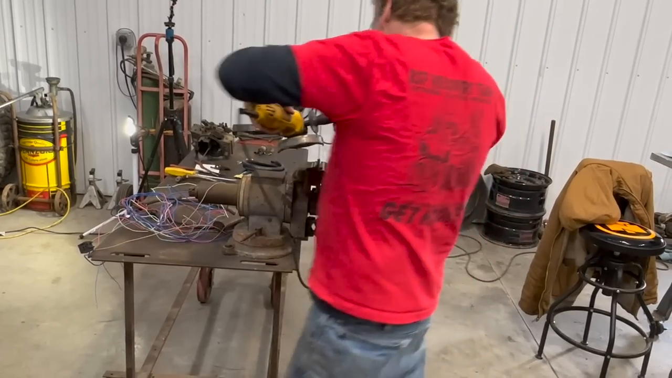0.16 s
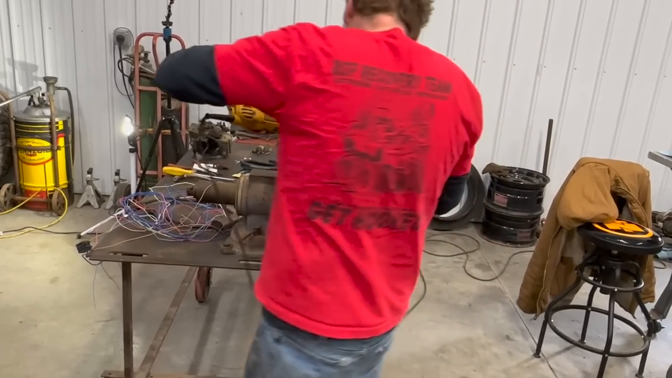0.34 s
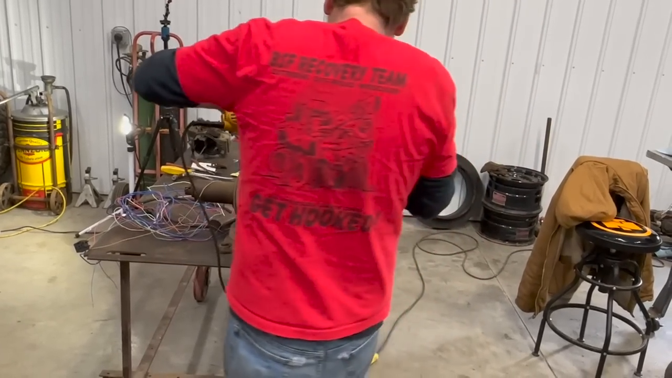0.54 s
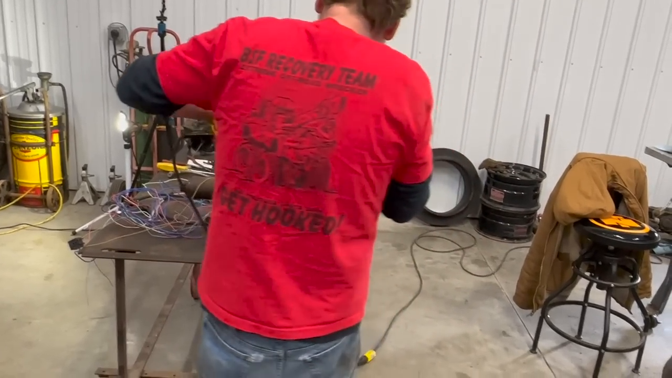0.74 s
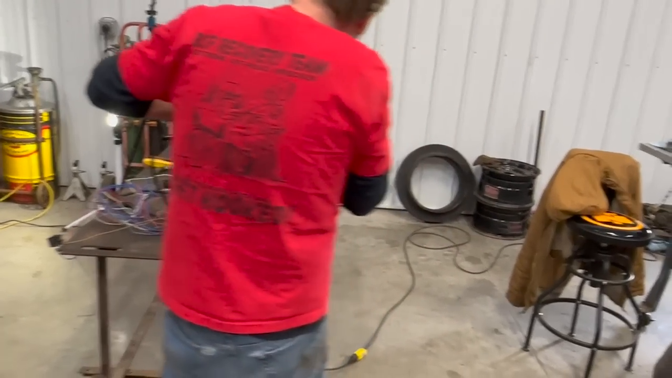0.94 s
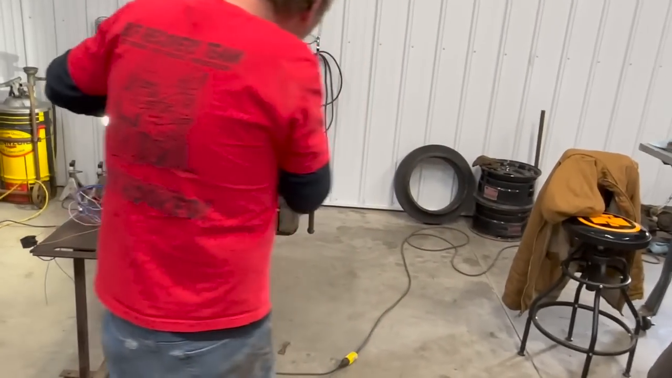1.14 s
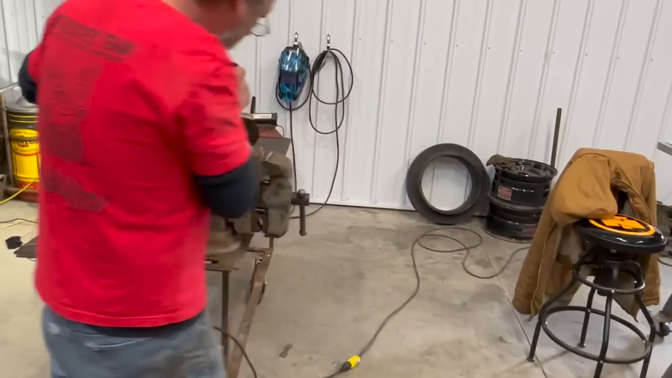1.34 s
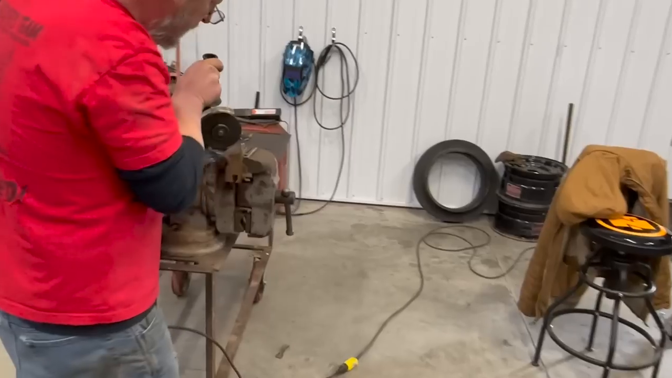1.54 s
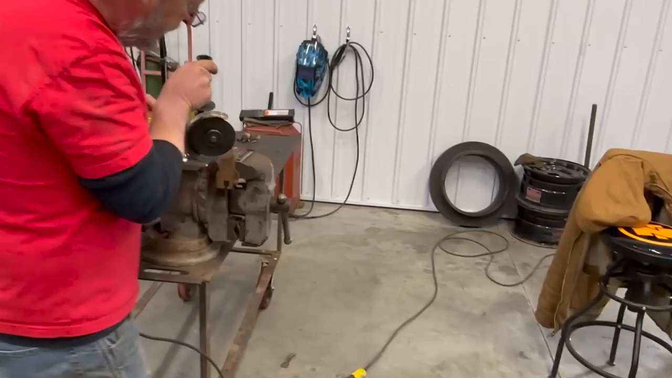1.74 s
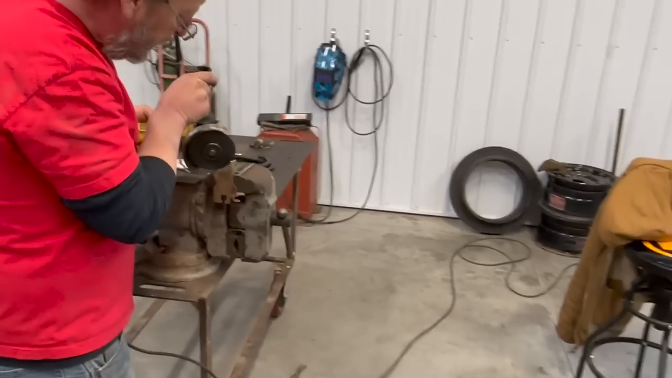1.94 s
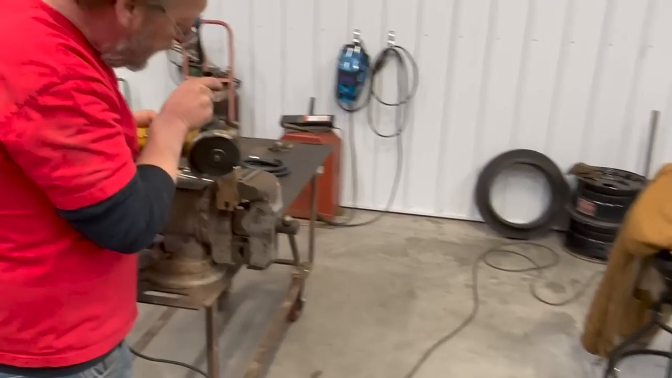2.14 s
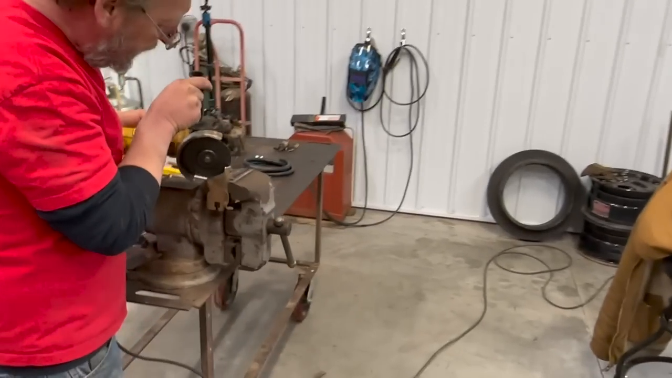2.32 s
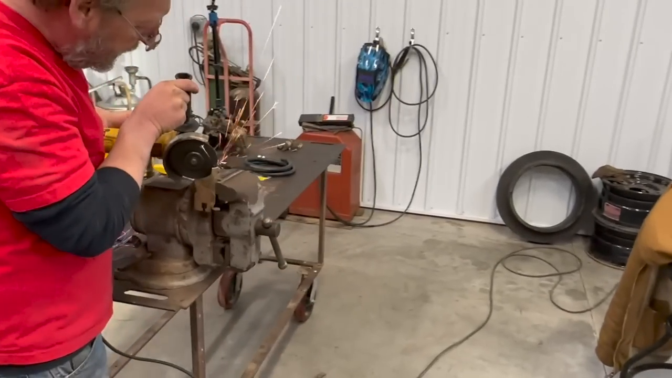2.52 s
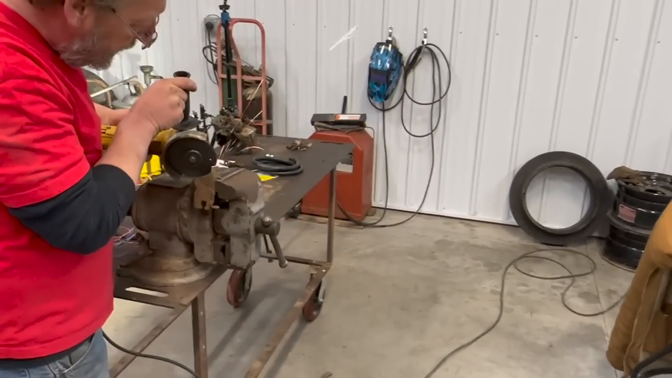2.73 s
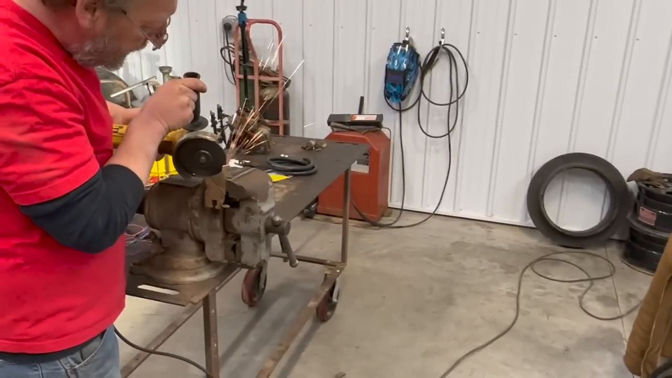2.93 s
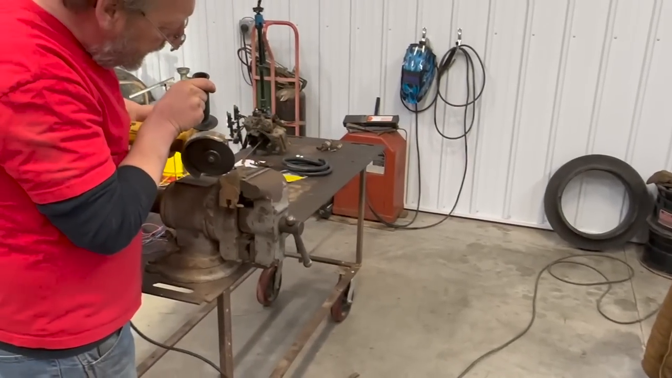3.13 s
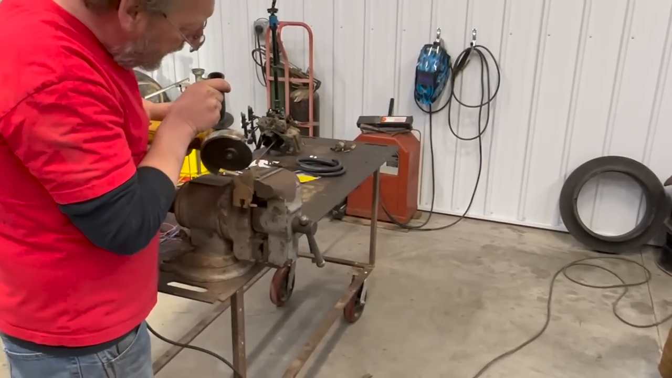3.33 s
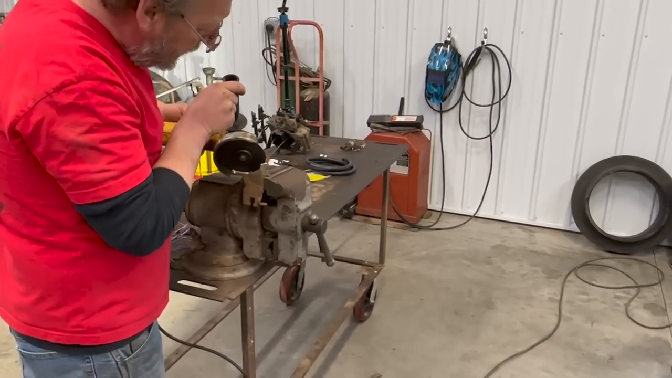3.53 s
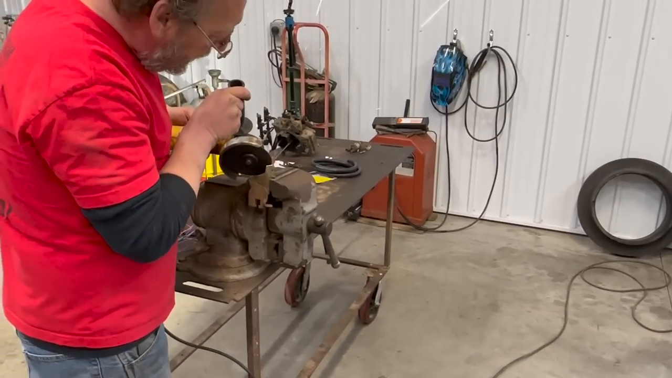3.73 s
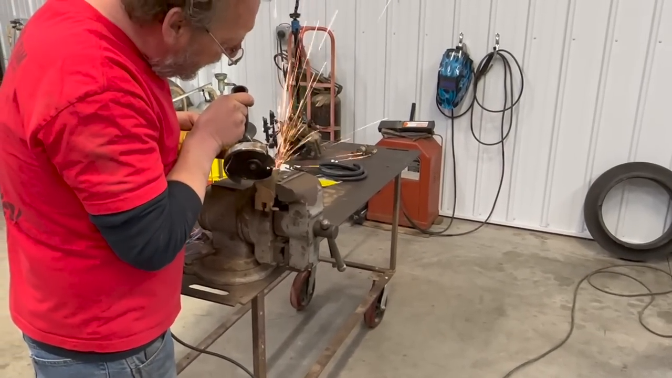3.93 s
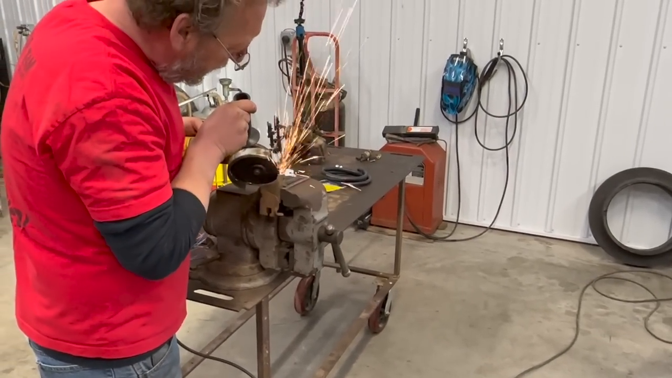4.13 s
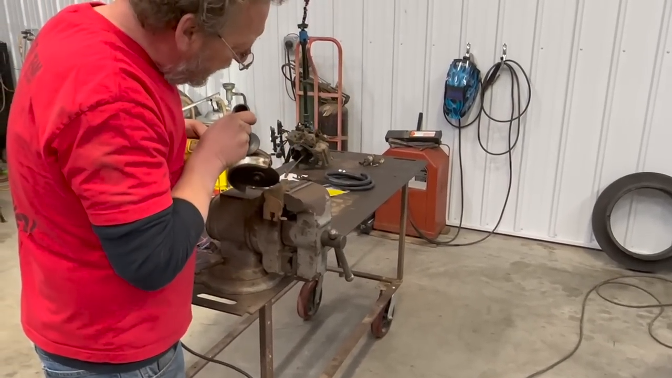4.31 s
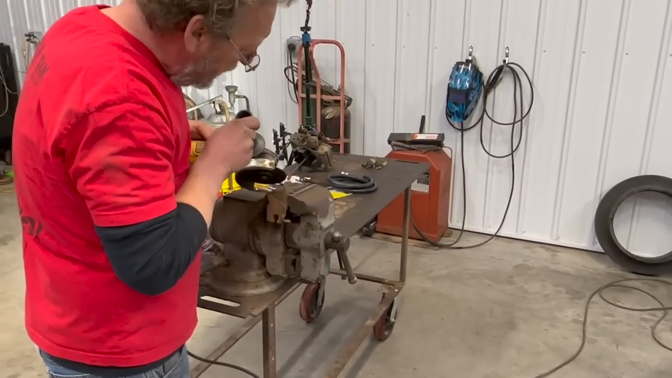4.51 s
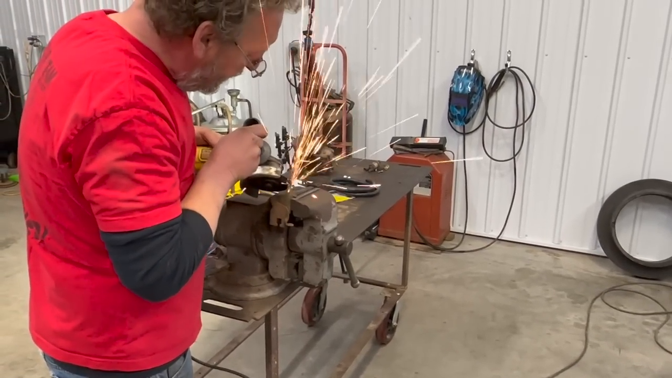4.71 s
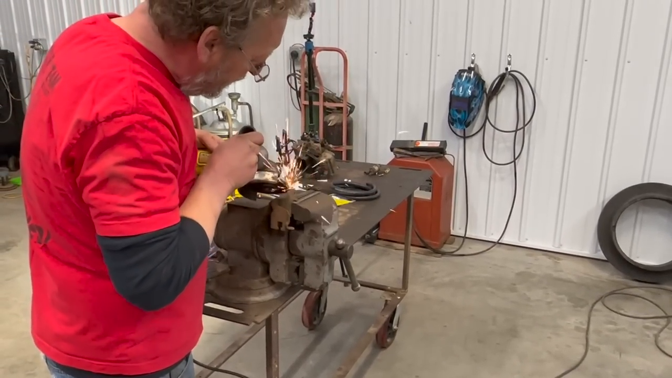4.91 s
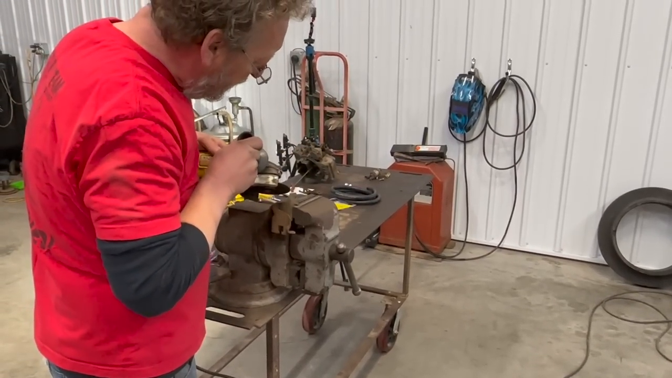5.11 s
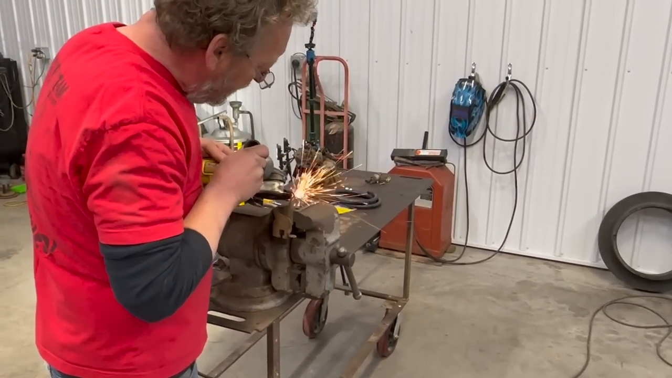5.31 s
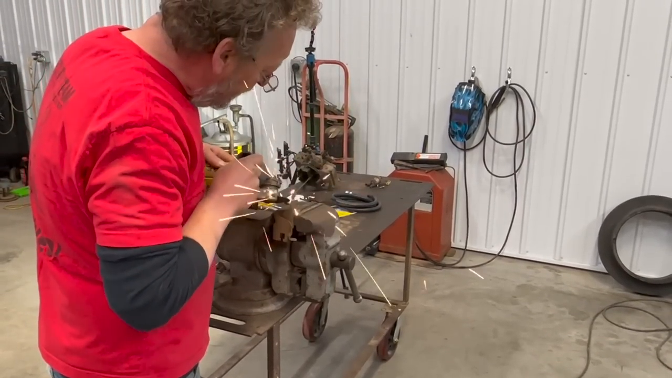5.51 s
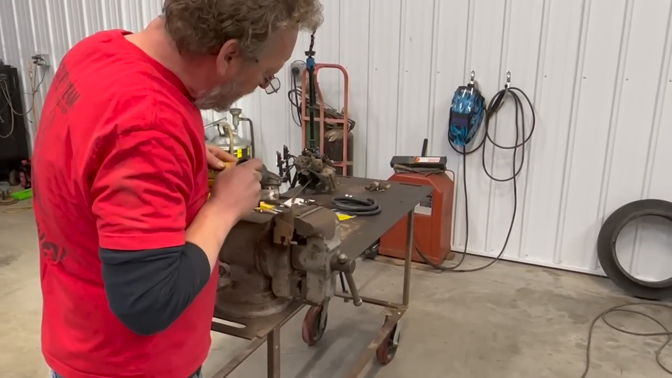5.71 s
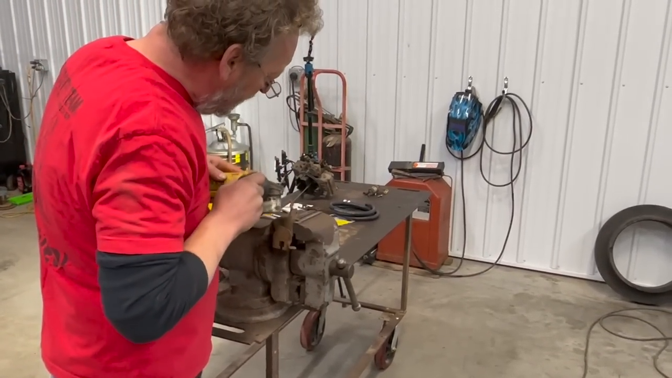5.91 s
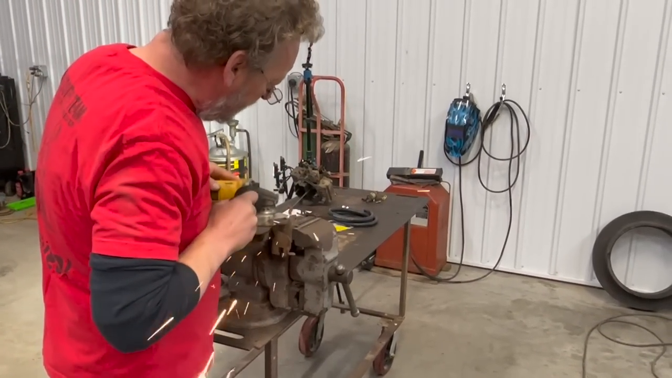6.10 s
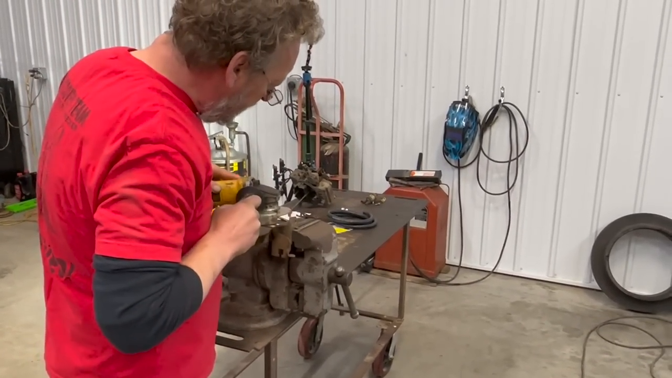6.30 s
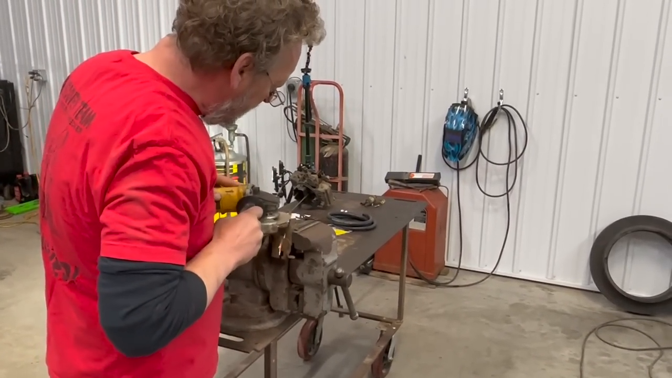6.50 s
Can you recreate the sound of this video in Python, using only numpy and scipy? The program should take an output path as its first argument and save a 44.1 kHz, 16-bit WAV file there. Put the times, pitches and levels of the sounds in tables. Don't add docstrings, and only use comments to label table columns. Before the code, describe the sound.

An angle grinder whirs and rattles in a metal workshop, its wheel biting a steel bracket in repeated rasping, ringing bursts while shoes scuff concrete.

```python
import sys
import numpy as np
from scipy import signal
from scipy.fft import rfft, irfft, next_fast_len
from scipy.io import wavfile
from scipy.ndimage import uniform_filter1d, map_coordinates

SR = 44100
rng = np.random.default_rng(int(sys.argv[2]) if len(sys.argv) > 2 else 0)


def materialize(psi):
    bounded = np.clip(np.atleast_2d(psi).T, -1, 1)
    quanta = np.round(bounded * 32767).astype(np.int16)
    wavfile.write(sys.argv[1], SR, quanta)


def volts_from_decibels(level):
    exponent = np.asarray(level, float) / 20
    return 10 ** exponent


N = 288855
GEARING = 9 / 32


def unit(x):
    return x / np.sqrt(np.mean(x ** 2) + 1e-20)


def along(points, hz):
    f, v = np.transpose(points)
    return np.interp(np.log(hz + 1), np.log(f + 1), v)


def curves(rows):
    s, *columns = np.transpose(rows)
    return [np.interp(np.arange(N) / SR, s, column) for column in columns]


def wobble(rate):
    knots = rng.standard_normal(int(N * rate / SR) + 4)
    return map_coordinates(knots, [np.arange(N) * rate / SR])


def filtered(x, response):
    size = next_fast_len(N + SR // 2)
    hz = np.fft.rfftfreq(size, 1 / SR)
    return irfft(rfft(x, size) * response(hz), size)[..., :N]


def coloured(x, spectrum):
    return unit(filtered(x, lambda hz: volts_from_decibels(along(spectrum, hz))))


# start and end in seconds, scrape in dB, bracket ring in dB, drag in turns per second squared.
TOUCHES = [
    (3.65, 3.701, -19.5, -18.5, 70.5),
    (4.312, 4.343, -44, -45, 20),
    (4.685, 4.709, -22.5, -19, 174),
    (5.3148, 5.352, -21, -21, 22),
    (6.04, 6.071, -29, -37, 80),
    (6.494, 6.56, -27, -29, 4.2),
]
PRESSES = [
    (2.347, 2.419, -21, -23.5, 40.7),
    (2.503, 2.84, -23.5, -24, 29),
    (2.809, 3.059, -24, -26, 51),
    (2.998, 3.136, -39, -31, 12),
    (3.728, 3.82, -24, -23.5, 45),
    (3.768, 3.997, -23.5, -24.5, 50),
    (3.931, 4.279, -24.5, -28.5, 66),
    (4.765, 4.964, -25.5, -30, 55),
    (5.327, 5.507, -26, -28.5, 82),
    (5.939, 6.067, -32, -31.5, 15.8),
]


def contact_db():
    t = np.arange(N) / SR
    out = np.full((2, N), -120.)
    for rows, attack, sag in [(TOUCHES, 0.0015, 127), (PRESSES, 0.05, 13)]:
        for start, end, scrape_db, ring_db, _ in rows:
            entry = -16 * np.clip(1 - (t - start) / attack, 0, 1)
            release = -480 * np.clip(t - end, 0, None)
            shape = entry - sag * (t - start) + release
            level = shape + np.array([[scrape_db], [ring_db]])
            out = np.maximum(out, np.where(t < start, -120, level))
    return out


def armature_turns():
    free_turns, recovery_s, inertia_s = 629.3, .33, .04
    t = np.arange(N) / SR
    drags = [turns_s2 * ((t > start) & (t < end)) for start, end, _, _, turns_s2 in TOUCHES + PRESSES]
    drag = np.max(drags, axis=0)
    lost = signal.lfilter([1 / SR], [1, -np.exp(-1 / (SR * recovery_s))], drag)
    speed = free_turns - uniform_filter1d(lost, size=int(inertia_s * SR))
    return np.cumsum(speed) / SR


# frequency in Hz, level in dB.
GEARS = [(500, -35), (800, -3), (1100, -24), (2800, -10), (3550, -0.5), (3900, -10), (6500, -14),
         (9300, -1), (10000, -16.5), (10600, 0), (11300, -11.5), (12000, -5.5), (15500, -15.5)]
# frequency in Hz, level in dB.
KNOCK = [(6000, -32), (9000, -16), (10000, 0), (11000, -1), (12200, -13), (15500, -34)]
# time in seconds, level in dB.
SIGHT = [(0, -5), (1.25, -3), (1.6, 0.5), (6.55, -1)]
# time in seconds, cooling air in dB, gear rattle in dB.
TOOL = [(0, -35, -26), (.2, -34.5, -26.5), (.45, -35.5, -43), (1.15, -35.5, -38.5), (1.55, -33, -26.5),
        (2.2, -32, -26), (2.9, -31.5, -21), (3.3, -32, -26.5), (3.62, -32.5, -25.5), (4.2, -33, -24.5),
        (4.45, -33, -28.5), (4.66, -33, -26.5), (5.0, -34, -28.5), (5.3, -34, -28), (5.8, -33, -30),
        (6.0, -32, -27.5), (6.3, -33, -30.5), (6.55, -32.5, -25.5)]
# time in seconds, peak in dB.
HARD_KNOCKS = [(1.5554, -13), (1.6062, -14), (1.6342, -10), (1.6736, -12), (1.7639, -11), (1.8876, -15),
               (2.0323, -10), (2.0852, -15), (2.2169, -14), (2.2772, -14), (2.2942, -11), (2.3276, -14),
               (2.4527, -7), (2.5177, -12), (2.5311, -7), (2.5486, -6), (2.6713, -14), (2.8414, -5),
               (3.0225, -17), (3.0505, -14), (3.1258, -16), (3.2174, -10), (3.263, -12), (3.2924, -10),
               (3.3, -10), (3.3204, -8), (3.3488, -18), (3.3662, -5), (3.4002, -9), (3.4111, -7),
               (3.495, -18), (3.5346, -19), (3.571, -14), (3.5864, -14), (3.6045, -19), (3.6217, -9),
               (3.6496, -15), (3.65, -5), (3.7236, -5), (3.7465, -11), (3.9205, -14), (4.0741, -12),
               (4.4109, -17), (4.5074, -8), (4.5583, -8), (4.5778, -11), (4.6857, -11), (4.6896, -8),
               (4.795, -13), (5.012, -13), (5.0749, -10), (5.1776, -11), (5.3155, -13), (5.3955, -14),
               (5.4998, -6), (5.7185, -13),
               (3.6954, -9), (3.7004, -12), (3.7064, -7), (3.7124, -12), (3.7184, -16), (3.7239, -9),
         (3.7524, -11), (3.7584, -7), (3.7694, -11), (3.7754, -12), (4.3154, -18), (4.3214, -21),
         (4.3291, -17), (5.3774, -13)]


def gear_rattle(turns, load_db):
    wheel = GEARING * turns
    hiss_db = 3 * np.cos(2 * np.pi * wheel) + 2.2 * wobble(70) + 1.2 * wobble(15)
    hiss = coloured(volts_from_decibels(hiss_db) * rng.standard_normal(N), GEARS)

    mains_hz = 60
    ripple = np.cos(2 * np.pi * (mains_hz * np.arange(N) / SR + 0.58 * wobble(12)))
    size_db = 6 * ripple + 3.2 * np.clip(rng.standard_normal(N), -2, 2)
    blows = np.diff(np.floor(wheel + .1 * wobble(150)), prepend=0) * volts_from_decibels(size_db)
    fade = volts_from_decibels(-60 * np.arange(600) / SR / 0.018)
    knocks = coloured(np.convolve(blows, fade)[:N] * rng.standard_normal(N), KNOCK)
    slack = np.clip((-28 - load_db) / 8, .3, 1)

    hard = np.zeros(N)
    s, db = np.transpose(HARD_KNOCKS)
    hard[(s * SR).astype(int)] = volts_from_decibels(db)
    t = np.arange(400) / SR
    tones = sum(np.sin(2 * np.pi * hz * t) for hz in (10050, 10500, 11100))
    casing = tones * volts_from_decibels(-60 * t / 0.013) * np.clip(t / .0004, 0, 1)
    hard_knocks = volts_from_decibels(-6.5) * np.convolve(hard, casing)[:N]

    rattle_db = curves(TOOL)[1] - 4.0
    sight_db = curves(SIGHT)[0] + 0.5
    return volts_from_decibels(rattle_db) * (hiss + slack * volts_from_decibels(sight_db) * knocks) + hard_knocks


def rim(turns, wear_rate, spots_db):
    even_grit = .6
    count, size = int(N * wear_rate / SR) + 3, 256
    noise = rng.standard_normal((count, size))
    high_spots = unit(uniform_filter1d(noise, size=24, mode="wrap"))
    orders = rfft(rng.standard_normal((count, size)) * volts_from_decibels(spots_db * high_spots))
    grit = irfft(orders / abs(orders) ** even_grit)
    grit = np.concatenate([grit, grit[:, :1]], axis=1)
    wear = np.arange(N) * wear_rate / SR
    read = map_coordinates(grit, [wear, turns % 1 * size], order=1)
    return unit(read / np.hypot(wear % 1, 1 - wear % 1))


# frequency in Hz, level in dB.
SCRAPE = [(150, -35.5), (600, -22.5), (850, -13), (1500, -14), (5000, -15), (9200, -19.5), (9900, 3),
          (10500, 3.5), (11400, -2), (12200, -4.5), (14000, -3), (15700, -3)]
# frequency in Hz, width in Hz, level in dB.
BRACKET = [(2780, 180, -6), (3200, 400, -3), (3620, 500, 0), (4280, 450, -4), (5600, 1200, -15),
           (6850, 350, -5), (8530, 400, -9)]


def cutting(turns, scrape_db, ring_db):
    wheel = GEARING * turns
    sparks_db = 3.4 * np.cos(4 * np.pi * wheel) + 5.8 * np.clip(wobble(300), -2, 2)
    sparks = unit(rng.standard_normal(N) * volts_from_decibels(sparks_db))
    scrape = coloured(rim(wheel, wear_rate=10, spots_db=3) + .7 * sparks, SCRAPE)

    def steel(hz):
        total = 0
        for k, (centre, width, db) in enumerate(BRACKET):
            damping = 1j * hz * width
            total = total + (-1) ** k * volts_from_decibels(db) * damping / (centre * centre - hz * hz + damping)
        return total

    grit = unit(rng.standard_normal(N) * volts_from_decibels(2.5 * wobble(200)))
    ring = unit(filtered(rim(wheel, wear_rate=22, spots_db=3) + .6 * sparks + grit, steel))
    keep = np.exp(-1 / (SR * .003))
    ring_level = signal.lfilter([1 - keep], [1, -keep], volts_from_decibels(ring_db + 0.3))
    return volts_from_decibels(scrape_db + 6.5) * scrape + ring_level * ring


# start in seconds, end in seconds, wheel order, level in dB.
CHATTER = [(2.43, 2.5, 6, -44), (2.53, 3.08, 6, -42), (2.83, 3.09, 7, -40), (2.82, 3.08, 8, -45),
           (3.68, 4.12, 1, -58), (4.8, 4.98, 1, -63), (3.77, 4.2, 7, -47), (3.96, 4.12, 5, -46),
           (4.11, 4.23, 5, -37), (5.4, 5.52, 5, -43), (2.38, 2.44, 8, -42), (2.38, 2.44, 21, -37),
           (2.43, 2.49, 19, -39), (2.54, 2.79, 17, -39), (2.53, 3.04, 18, -35), (2.63, 2.69, 19, -33),
           (2.83, 3.09, 16, -34), (2.8, 3.09, 21, -32), (2.93, 2.99, 21, -30), (2.74, 3.09, 23, -38),
           (2.79, 2.94, 24, -38), (2.54, 3.08, 25, -35.5), (2.38, 2.5, 39, -41), (2.54, 2.74, 39, -34),
           (2.83, 2.94, 39, -34), (2.54, 2.64, 49, -34), (2.79, 3.08, 49, -36), (3.72, 4.1, 18, -39),
           (3.82, 4.02, 16, -35), (3.96, 4.17, 19, -33), (3.81, 3.92, 20, -32), (3.91, 4.21, 20, -37),
           (3.76, 4.17, 21, -34), (3.76, 3.9, 24, -37), (3.72, 4.06, 25, -35), (3.91, 4.11, 23, -36),
           (3.76, 4.07, 49, -32), (3.77, 3.87, 39, -36), (4.81, 4.95, 16, -29.5), (4.68, 4.74, 18, -31),
           (4.81, 4.91, 21, -34), (4.81, 4.96, 20, -38), (5.32, 5.39, 19, -38), (5.32, 5.49, 18, -39),
           (5.36, 5.51, 16, -35), (5.4, 5.52, 15, -36), (5.39, 5.5, 21, -37), (4.18, 4.25, 16, -37),
           (3.645, 3.71, 21, -32), (5.34, 5.5, 25, -40)]


def chatter(turns):
    flutter, slip, out = wobble(32), wobble(45), np.zeros(N)
    for start, end, order, db in CHATTER:
        flutter, slip = np.roll(flutter, SR // 2), np.roll(slip, SR // 2)
        held = slice(int(start * SR), int(end * SR))
        t = np.arange(held.start, held.stop) / SR
        swell = np.clip(np.minimum(t - start, end - t) / .03, 0, 1)
        rough = np.clip(order / 16, .3, 1)
        level = volts_from_decibels(db + 3.5 + rough * 3 * np.clip(flutter[held], -3, 1)) * swell
        phase = order * GEARING * turns[held] + .08 * rough * slip[held]
        out[held] += level * np.sin(2 * np.pi * phase)
    return out


# time in seconds, whine in dB.
WHINE = [(0, -32), (.12, -27), (.25, -37), (.9, -34), (1.5, -48), (2.3, -44), (2.5, -27), (3.15, -24),
         (3.6, -33), (3.8, -24), (4.05, -26), (4.35, -21), (4.7, -23), (5.2, -25), (5.35, -24.5),
         (5.85, -23), (6.25, -22.5), (6.45, -33)]


def fan_whine(turns):
    blades = 25
    level_db = curves(WHINE)[0] + 2.4 + 3.5 * np.clip(wobble(24), -3, 1.3)
    return volts_from_decibels(level_db) * np.sin(2 * np.pi * (blades * turns + .08 * wobble(40)))


# time in seconds, armature hum in dB, left minus right in dB.
HUM = [(0, -40.5, 3), (.8, -37.5, -3), (1.1, -40.5, 2), (1.28, -52, -6), (1.6, -44, 14), (2.3, -60, 27),
       (2.5, -39, -6), (2.72, -36.5, 0), (3.45, -38.5, -2), (3.56, -41.5, -10), (4.05, -38.5, -1),
       (4.35, -42.5, 0), (4.9, -43.5, -9), (5.05, -48, -6), (5.3, -52, 0), (5.5, -40.5, -5), (5.95, -52, 7),
       (6.55, -52, 6)]


def armature_hum(turns):
    level_db, pan_db = curves(HUM)
    drift = 0.074 * np.array([wobble(2.97), wobble(3.0)])
    sides_db = np.array([pan_db, -pan_db]) / 2
    return volts_from_decibels(level_db - 1.5 + sides_db) * np.sin(2 * np.pi * (turns + drift))


# frequency in Hz, likeness (1 = same).
ALIKE = [(60, 1), (130, .9), (300, 0.84), (800, 0.71), (1300, 0.56), (2400, 0.52), (3200, 0.031),
         (6000, 0.057), (8300, 0.093), (10500, 0.48), (15000, 1)]


def spread(pair):
    def mid_side(hz):
        angle = np.arccos(np.clip(along(ALIKE, hz), -1, 1)) / 2
        return np.array([np.cos(angle), np.sin(angle)])

    mid, side = filtered(pair, mid_side)
    return np.array([mid + side, mid - side])


def diffuse(spectrum):
    return coloured(spread(rng.standard_normal((2, N))), spectrum)


# frequency in Hz, level in dB per Hz.
AIR = [(250, -30.5), (480, -18), (800, -8.5), (1150, -7), (1550, -3), (2600, -2), (4300, -8), (6300, -7),
       (8000, -11), (10400, -9), (13000, -18), (15500, -14.5)]


def cooling_air():
    z = signal.stft(diffuse(AIR), nperseg=1024)[2]
    streaks = uniform_filter1d(rng.standard_normal(z.shape[1:]), size=3, axis=0)
    streaks = unit(uniform_filter1d(streaks, size=9, axis=1))
    air = unit(signal.istft(z * volts_from_decibels(2.2 * streaks), nperseg=1024)[1][:, :N])
    return volts_from_decibels(curves(TOOL)[0] + 7.5 + 0.22 * wobble(4.2)) * air


# frequency in Hz, seconds to fall by 60 dB.
WALLS = [(500, .45), (3000, .22), (10000, .15), (16000, .1)]


def walls(x):
    hz, t, z = signal.stft(rng.standard_normal((2, SR // 2)), SR, nperseg=256)
    fade = volts_from_decibels(-60 * t / along(WALLS, hz)[:, None])
    tail = signal.istft(z * fade, SR, nperseg=256)[1]
    late = np.pad(x, (300, 0))[None]
    return signal.fftconvolve(late, tail / np.linalg.norm(tail[0]), axes=1)[:, :N]


# frequency in Hz, level in dB.
WET = [(500, -7), (2500, -2.5), (3500, -2), (6000, -3.5), (8000, 0.5), (15000, -16.5)]


def workshop_echo(direct, sung):
    bounced = spread(walls(direct + volts_from_decibels(-9) * sung))
    return filtered(bounced, lambda hz: volts_from_decibels(along(WET, hz)))


# frequency in Hz, level in dB per Hz.
FLOOR = [(15, -52), (25, -8), (192, 1.5), (588, 1.5), (638, 3), (750, -10), (840, -1), (1000, -10),
         (1200, -11), (1560, -36), (2640, -120)]
# time in seconds, level in dB.
RUMBLE = [(0, -49.5), (.7, -55), (2.9, -50.5), (4.4, -55), (5.9, -59), (6.4, -52.5)]
# start in seconds, hold in seconds, level in dB.
STEPS = [
    (0.844, 0.13, -41),
    (1.185, 0.18, -45),
    (1.497, 0.15, -38),
    (2.12, 0.12, -43),
    (2.447, 0.12, -41.5),
    (3.899, 0.12, -62),
    (4.68, 0.02, -62),
]


def shoes():
    attack_s, sag_db_per_s, fade_db_per_s = 0.047, 14, 45
    t = np.arange(N) / SR
    level = volts_from_decibels(curves(RUMBLE)[0] + 1.4 * wobble(9))
    for start, hold, db in STEPS:
        sag_db = sag_db_per_s * np.clip(t - start, 0, None)
        fade_db = fade_db_per_s * np.clip(t - start - attack_s - hold, 0, None)
        level = level + np.clip((t - start) / attack_s, 0, 1) * volts_from_decibels(db - sag_db - fade_db)
    return level * volts_from_decibels(1.24 * wobble(30)) * diffuse(FLOOR)


def scene():
    turns = armature_turns()
    scrape_db, ring_db = contact_db()
    direct = gear_rattle(turns, scrape_db) + cutting(turns, scrape_db, ring_db) + fan_whine(turns)
    sung = chatter(turns)
    echo = workshop_echo(direct, sung)
    return direct + sung + echo + cooling_air() + armature_hum(turns) + shoes()


# frequency in Hz, lead in radians.
LEAD = [(100, 0), (2400, .4), (2900, -.7), (3400, 1.5), (5400, 3.1), (6400, 6.6), (7300, 7.3), (8000, 9),
        (8800, 8.8), (9400, 7.4), (10900, 6.3), (12800, 6.3), (13800, 5.2), (15300, 4.2)]
# frequency in Hz, left minus right in dB.
TILT = [(100, 1), (1200, 1.5), (2200, -1.5), (3200, 3), (5000, 4), (6400, 7.5), (7300, 1), (8000, -.5),
        (9000, .5), (11000, 0)]


def ports(x):
    half = np.array([[.5], [-.5]])
    return filtered(x, lambda hz: volts_from_decibels(half * along(TILT, hz)) * np.exp(1j * half * along(LEAD, hz)))


# frequency in Hz, level in dB.
THRIFT = [(3500, -30), (4700, -9), (5600, -13), (7700, -8.5), (8700, -6.5), (9400, -16), (13000, -13),
          (14300, -8), (15000, -4.5), (15400, -11)]


def mute_faint_treble(x, side_db):
    side_hz, top_hz, shift = 10700, 15800, 269
    mid_side = np.pad([x[0] + x[1], x[0] - x[1]], [(0, 0), (shift, 0)])
    hz, _, z = signal.stft(mid_side, SR, window="cosine", nperseg=2048)
    power = abs(z[:, :1024]) ** 2
    band = np.repeat(power.reshape(2, 64, 16, -1).mean(axis=2), repeats=16, axis=1)
    vary_db = np.repeat(rng.normal(0, 3, (2, 64, z.shape[-1])), repeats=16, axis=1)
    under = band / power.mean(axis=(0, 1)) * volts_from_decibels(vary_db)
    limit_db = along(THRIFT, hz[8:1024:16]).repeat(16)
    z[0, :1024] *= under[0] > volts_from_decibels(2 * limit_db)[:, None]
    z[1, :1024] *= (under[1] > volts_from_decibels(2 * side_db)) | (hz[:1024, None] < side_hz)
    z[:, hz > top_hz] = 0
    mid, side = signal.istft(z, SR, window="cosine", nperseg=2048)[1][:, shift:shift + N] / 2
    return np.array([mid + side, mid - side])


def band_limit(x):
    return signal.sosfilt(signal.butter(12, 16910, fs=SR, output="sos"), x)


def record(dry):
    heard = filtered(ports(dry), lambda hz: hz ** 2 / (hz ** 2 + 45 ** 2))
    held = heard / (1 + abs(heard / .85) ** 6) ** (1 / 6)
    mix = mute_faint_treble(held, side_db=-8)
    return band_limit(mix)


dry = scene()
out = record(dry)
materialize(out)
```